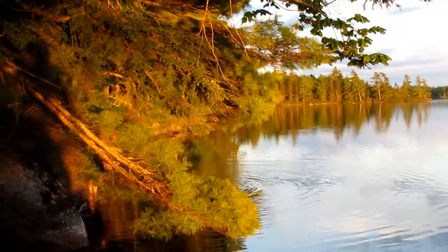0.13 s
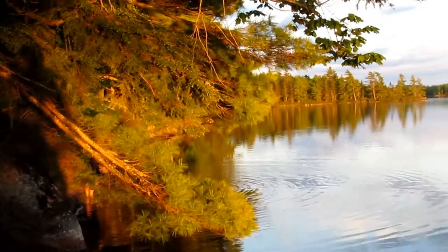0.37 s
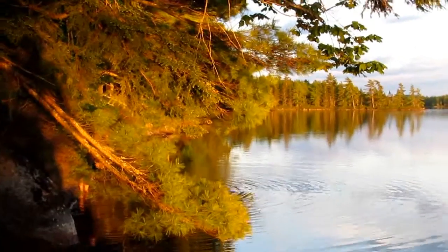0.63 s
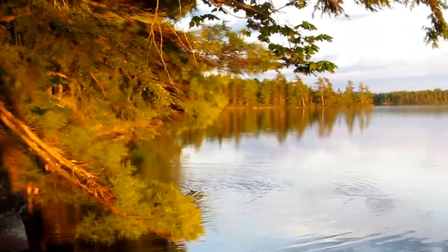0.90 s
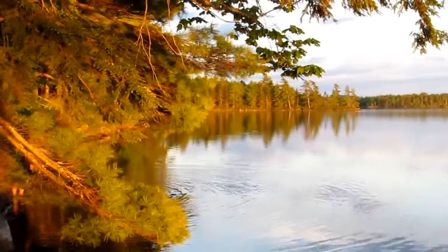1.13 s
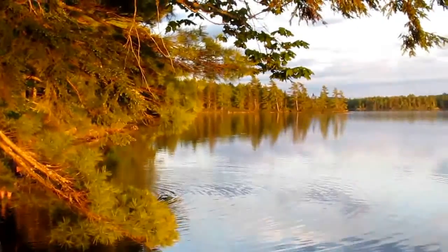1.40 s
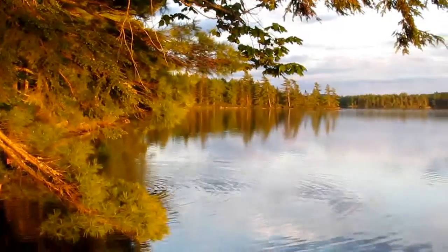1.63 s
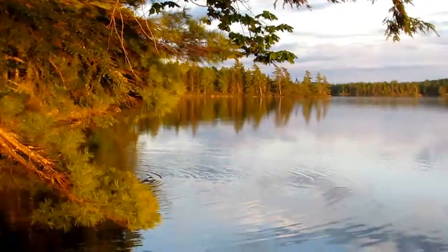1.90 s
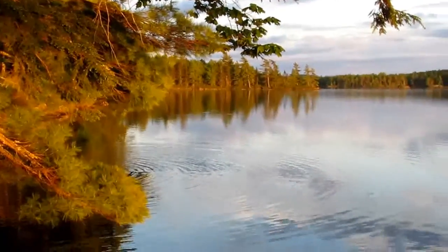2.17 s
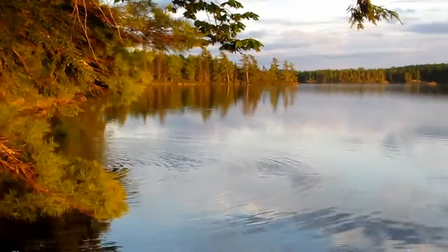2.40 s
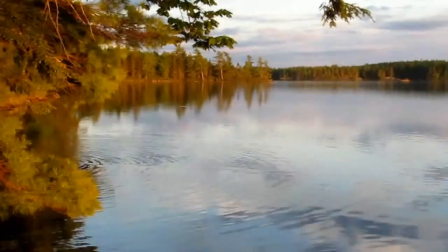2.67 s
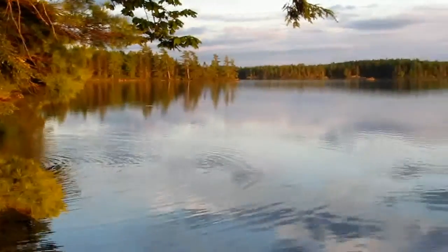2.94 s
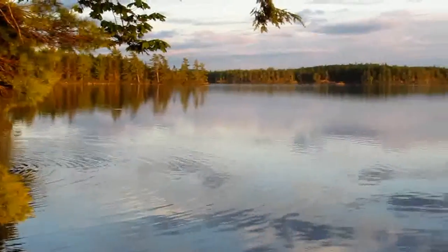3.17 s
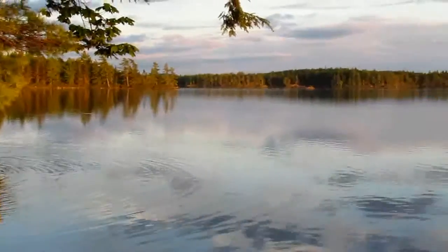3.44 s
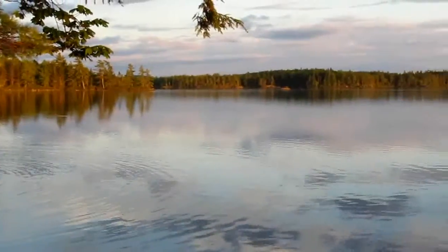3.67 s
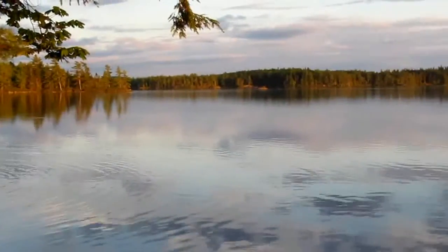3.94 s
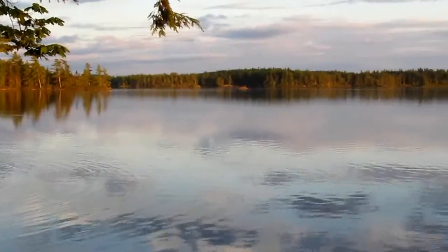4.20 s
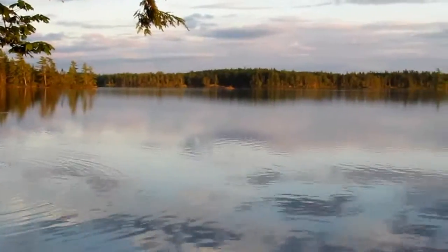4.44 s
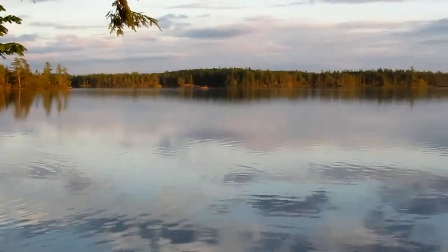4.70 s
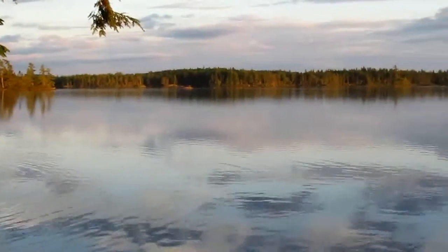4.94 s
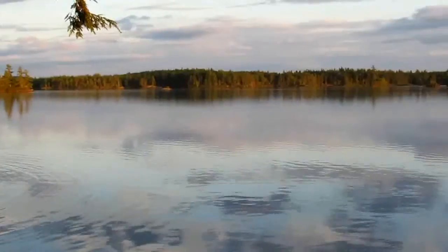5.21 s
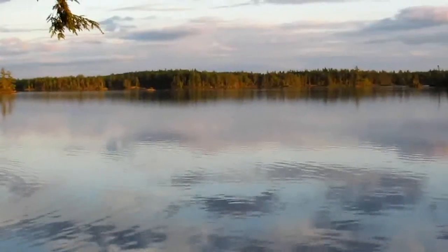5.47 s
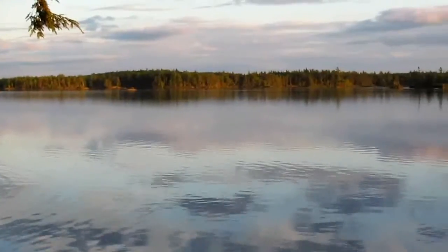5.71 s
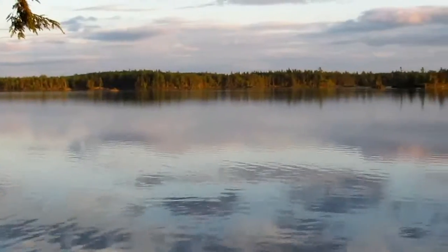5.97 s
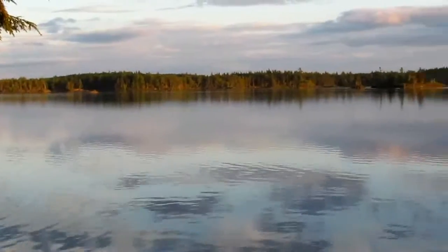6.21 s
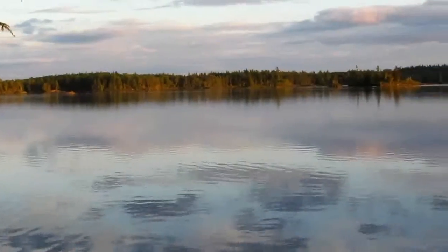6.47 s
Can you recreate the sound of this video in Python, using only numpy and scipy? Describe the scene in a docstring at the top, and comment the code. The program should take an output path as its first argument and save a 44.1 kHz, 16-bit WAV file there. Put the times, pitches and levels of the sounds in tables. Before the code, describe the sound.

Begins with loud, dry handling noise in stereo: scraping skin, hollow plastic knocks, a short creak and popping taps stronger on the left. Clicks come after, the third one crisp, the last weaker. The open lake shore then emerges, with delicate laps and clear little bubbles nearby, a steady narrow trill of many far toads, two tiny bird peeps near the end, and low hiss.

```python
"""Hands on a camera by a lake

A calm lake shore at dusk: a hand-held camera is gripped, rubbed and creaks, then a button clicks a few times.
Rubbing is shaped noise; knocks, creak and clicks strike resonant modes; taps are pushes of air on a port.
Small waves lap on the stones as noise and tiny damped sines, with clear bubbles and bursting drops on top.
Far toads hum as a narrow band of noise and a bird peeps in plain sines, over microphone hiss."""
import sys
import numpy as np
from scipy import signal
from scipy.fft import rfft, irfft, next_fast_len
from scipy.io import wavfile
from scipy.ndimage import uniform_filter1d, map_coordinates

SR = 44100
rng = np.random.default_rng(int(sys.argv[2]) if len(sys.argv) > 2 else 0)


def generate_wav(sig):
    """Save sig (samples, or channels by samples) to the path in sys.argv[1] as 16-bit PCM at SR."""
    pcm = np.round(np.clip(np.atleast_2d(sig).T, -1, 1) * 32767).astype(np.int16)
    wavfile.write(sys.argv[1], SR, pcm)


def rack_gain(trim_db):
    """Turn a fader trim in dB into the linear factor to multiply a signal by."""
    fader = np.asarray(trim_db, float)
    return 10 ** (fader / 20)


N = 291166  # samples, 6.6 s


def unit(x):
    """Scale to rms 1."""
    return x / np.sqrt(np.mean(x ** 2) + 1e-20)


def along(points, hz):
    """Read (Hz, value) points on a log frequency axis."""
    f, value = np.transpose(points)
    return np.interp(np.log(hz + 1), np.log(f + 1), value)


def curves(tables):
    """One value per sample for each column; the first (dB) is silent outside the tables."""
    out = np.zeros((len(tables[0][0]) - 1, N))
    out[0] = -120
    t = np.arange(N) / SR
    for rows in tables:
        s, *columns = np.transpose(rows)
        on = (t >= s[0]) & (t <= s[-1])
        out[:, on] = [np.interp(t[on], s, column) for column in columns]
    return out


def wobble(rate):
    """A smooth random curve, rate knots a second."""
    knots = rng.standard_normal(int(N * rate / SR) + 4)
    return map_coordinates(knots, [np.arange(N) * rate / SR])


def filtered(x, response):
    """Filter x by a complex response of frequency."""
    m = next_fast_len(N + SR // 2)
    return irfft(rfft(x, m) * response(np.fft.rfftfreq(m, 1 / SR)), m)[..., :N]


def sides(pan_db):
    """Left and right gains for a level difference; positive leans left."""
    return rack_gain(np.array([pan_db, -pan_db]) / 2)


def patches(depth_db):
    """Stereo white noise whose level wanders in patches over time and pitch."""
    z = signal.stft(rng.standard_normal((2, N)), nperseg=256)[2]
    field = uniform_filter1d(rng.standard_normal(z.shape[1:]), size=6, axis=0)
    field = uniform_filter1d(field, size=10, axis=1)
    return signal.istft(z * rack_gain(depth_db * unit(field)), nperseg=256)[1][:, :N]


def noise(spectrum, alike, lead=0, patchy_db=0):
    """Stereo noise of rms 1, partly shared; the left leads by a phase in radians."""
    a, b = patches(patchy_db) if patchy_db else rng.standard_normal((2, N))
    turn = np.arccos(np.clip(alike, 0, 1)) / 2
    pair = np.cos(turn) * a + np.sin(turn) * np.array([b, -b])
    phase = np.exp(.5j * lead * np.array([[1], [-1]]))
    return unit(filtered(pair, lambda hz: rack_gain(along(spectrum, hz)) * phase))


def through(x, modes):
    """x rings the modes, which alternate in sign; an impulse comes out with a peak near 1."""
    def response(hz):
        total = 0
        for k, (centre, width, left_db, right_db) in enumerate(modes):
            band = 1j * hz * width / (centre * centre - hz * hz + 1j * hz * width)
            total = total + (-1) ** k * rack_gain([[left_db], [right_db]]) * band
        return total
    return filtered(x, response) * SR / (2 * np.pi * sum(mode[1] for mode in modes))


def add(out, s, wave):
    """Mix a short wave in at time s."""
    k = round(s * SR)
    out[:, k:k + wave.shape[1]] += wave


def burst(t60, alike, spike):
    """A rough contact of energy 1: dying, partly shared noise, led by a spike that is late on the right."""
    t = np.arange(SR // 50) / SR
    z = rng.standard_normal((3, len(t)))
    z = (alike * z[0] + (1 - alike) * z[1:]) * rack_gain(-60 * t / t60)
    z[[0, 1], [0, 14]] -= spike * np.linalg.norm(z, axis=1)
    return z / np.linalg.norm(z, axis=1, keepdims=True)


def scattered(per_s, level_db, scatter_db):
    """Random moments before the last second, kept while a layer sounds: time, level, two normal draws."""
    z = rng.standard_normal((int(per_s * N / SR), 3))
    s = rng.uniform(0, N / SR - 1, len(z))
    db = level_db[(s * SR).astype(int)]
    return np.column_stack([s, db + scatter_db * z[:, 0], z[:, 1:]])[db > -100]


# three strokes of fingers on the casing: start_s, level_db, rumble_offset_db, treble_offset_db
RUB_STROKES = [
    [(0, -53.5, 2, 0), (.08, -55.5, -7, 3.5), (.15, -47.5, 1.5, -4.5), (.2, -45, -2, 0), (.28, -46, -6, 10),
     (.34, -49.5, -1, 3.5), (.43, -41, -8.5, 1.5), (.46, -46.5, 2.5, -4), (.52, -53.5, 5, -1.5),
     (.615, -48.5, -2, -6)],
    [(.62, -45.5, 5, -1), (.67, -48, 5, -13), (.685, -52.5, 10, 11), (.745, -50, 12, 13),
     (.757, -33, -3, 4.5), (.77, -35, 0, 2), (.787, -40.5, 6, 3), (.815, -46.5, 4, 3), (.83, -48, 6, 8),
     (.84, -57, 11, 0), (.88, -66, 4, 2)],
    [(1.18, -76, -12, 16), (1.245, -74, -9, 10), (1.26, -64.5, -9, 19), (1.36, -74, -9, 10)],
]
# the rustle's colour: freq_hz, relative_db_per_hz
RUSTLE_COLOUR = [(530, -15), (900, -15.5), (1210, -16), (1490, -12), (2080, -5.5), (3020, -10), (5370, -8),
                 (6910, -18.5), (10900, -11), (15800, -20.5)]
# the held casing's rumble: freq_hz, relative_db_per_hz
GRIP_RUMBLE = [(25, -33), (50, 0.5), (120, 1), (300, -6.5), (500, -8), (900, -12.5), (2000, -12),
               (4000, -92)]
# where the fingers are: time_s, left_minus_right_db
FINGER_SIDE = [(0, 0.5), (.745, 0), (.8, 6), (.85, 1)]
# the skin lets go and the rub jumps: start_s, jump_db
RUB_SURGES = [(.281, 6), (.336, 8.5), (.41, 3), (.47, 5)]


def rub():
    """Skin drags on the casing: crackling rustle over a lumpy rumble."""
    level_db, rumble_db, treble_db = curves(RUB_STROKES)
    t = np.arange(N) / SR
    pan_db = np.interp(t, *np.transpose(FINGER_SIDE))
    surge_fade_s = 0.02
    for s, jump_db in RUB_SURGES:
        level_db = level_db + jump_db * (t >= s) * np.exp(-np.abs(t - s) / surge_fade_s)
    crackle = rack_gain(1.4 * wobble(59.63) + 1.8 * wobble(700))
    cloth = noise(RUSTLE_COLOUR, 0.35, patchy_db=2.5) * unit(crackle)
    split_hz = 6100.0
    body = filtered(cloth, lambda hz: 1 / (1 + ((hz + 1) / split_hz) ** 4))
    treble = filtered(cloth, lambda hz: 1 / (1 + ((hz + 1) / split_hz) ** -4))
    rustle = body + rack_gain(treble_db) * treble
    rumble = noise(GRIP_RUMBLE, 0.32) * unit(rack_gain(5.2 * wobble(40.1)))
    return rack_gain(level_db) * sides(pan_db) * (1.6 * rustle + rack_gain(rumble_db) * rumble)


def creak_slips():
    """A seam creaks in six evenly spaced slips that weaken; rows as in the knock table."""
    start_s, gap_s, first_db, loss_db = .6743, .0063, -23, 1.5
    return [(start_s + k * gap_s, first_db - k * loss_db, 0.5, -9.5, 1.5) for k in range(6)]


def skin_ticks():
    """Dragging skin catches in small random ticks; rows as in the knock table."""
    moments = scattered(30, curves(RUB_STROKES)[0], scatter_db=4)
    return [(s, db + 3, -5, 5 * a - 4, 5 * b) for s, db, a, b in moments]


def soft(edge_hz):
    """A fingertip is too soft to excite far above the modes: a two-pole low-pass."""
    return lambda hz: 1 / (1 + 1j * hz / edge_hz) ** 2


# casing knocks: start_s, drive_db, thud_offset_db, crack_offset_db, left_minus_right_db
CASING_KNOCKS = [(.084, -49, -14, 5.5, -10), (0.0973, -34, -5, -4, -3), (0.1104, -36, -2.5, -1, 6),
                 (0.1325, -36, 1, -8, -6), (.165, -23.5, -7, -2.5, -6.5), (.176, -39, -4, -4, -3),
                 (0.283, -40.5, 0, 7, 2), (.474, -38, -7, -13, -10), (0.49, -34.5, -7, -3, -4),
                 (0.5134, -34.5, 0, -9, -3), (0.6257, -18.5, -5.5, -4, -4.5), (.6328, -25, 0, -6, -2),
                 (0.6566, -21, -4.5, -12.5, 2), (0.7215, -23.5, -2, -12, 0), (0.7475, -23.5, -5, -5, 9),
                 (0.7581, -33, -3, 10.5, 10), (0.806, -27.5, -2, -11, -4), (0.8188, -32, -11, 9, 2.5),
                 (.828, -33.5, -4, 10, 1), (0.9296, -41, 4, -14, 0), (0.9371, -43.5, 5.5, -6.5, -3),
                 (1.213, -58, -2, 6.5, 3), (1.439, -44.5, -3, -6, 1)]
# low casing modes: freq_hz, width_hz, left_db, right_db
THUD_MODES = [(145, 75, -9.5, 3.5), (315, 34, 4.5, 3.5), (440, 64, 6.5, -2), (517, 160, 0, 1)]
# middle casing modes: freq_hz, width_hz, left_db, right_db
RING_MODES = [(760, 210, 1, 1.5), (1050, 97, 7.5, 1.6), (1350, 240, 8.5, 5.5), (1720, 134, 8.5, 9.7),
              (2440, 840, -9, 4)]
# high casing modes: freq_hz, width_hz, left_db, right_db
CRACK_MODES = [(4500, 2000, 6.6, 6.5), (7300, 1700, 5.3, -12), (11000, 2800, 5, 5)]


def knocks():
    """Each knock, slip or tick drives the low, middle and high casing modes in its own proportion."""
    thud, ring, crack = np.zeros((3, 2, N))
    for s, db, thud_db, crack_db, pan_db in CASING_KNOCKS + creak_slips() + skin_ticks():
        gain = rack_gain(db) * sides(pan_db)[:, None]
        add(thud, s, gain * rack_gain(thud_db + 8) * burst(0.0041, 0.59, spike=2.0))
        add(ring, s, gain * rack_gain(12.5) * burst(0.0069, 0.14, spike=.6))
        add(crack, s, gain * rack_gain(crack_db + 19.5) * burst(.007, 0.13, spike=.5))
    low = filtered(through(thud, THUD_MODES), soft(1500.0))
    middle = filtered(through(ring, RING_MODES), soft(3340.0))
    return low + middle + through(crack, CRACK_MODES)


# finger taps beside the left port: start_s, level_db, push_s, swing_back (ratio), right_cut_db
PORT_TAPS = [(.012, -17, .0003, .4, 19), (.05, -18, .0003, .45, 17), (.152, -25, .0003, .5, 22),
             (.385, -34.5, .001, 1.3, -2), (.7481, -8, .0002, .5, 15), (.78495, -1.5, .00035, .8, 26)]


def taps():
    """A push of air on the port: a spike that rings the port's cavity, then a slow swing back."""
    out, t = np.zeros((2, N)), np.arange(SR // 30) / SR
    port_hz, swing_hz = 4000, 200
    for s, db, push_s, back, right_cut_db in PORT_TAPS:
        swing = back * np.sin(2 * np.pi * swing_hz * t) * np.exp(-t / .0022) * (1 - np.exp(-t / .0007))
        spike = np.exp(-t / push_s) * (1 - np.exp(-t / .00003))
        cavity = 1.1 + .45 * np.cos(2 * np.pi * port_hz * (t - .00005))
        add(out, s, rack_gain(db) * rack_gain([[0], [-right_cut_db]]) * (spike * cavity - swing))
    return out


# button clicks: start_s, level_db, ring_hz, thud_offset_db, crack_offset_db, left_minus_right_db
BUTTON_CLICKS = [(0.9029, -27, 1884, -5.5, -9, 6), (1.0570, -25, 1880, -4.5, -6, 4.5),
                 (1.4610, -19, 2040, -29, -9.5, 5.5), (2.54, -32.5, 2055, -19.5, -12.5, 7)]
# button modes, the first two for the thud, the rest for the crack: freq_hz, width_hz, left_db, right_db
BUTTON_MODES = [(567, 130, -6.5, 6), (1240, 160, -20, -2), (2540, 630, -0.5, 4.5), (3600, 440, 1.5, 6),
                (4800, 730, -8, -2), (7000, 2300, -9.5, -7), (10300, 6000, -14, -8)]


def clicks():
    """A button gives way over a few milliseconds; its spring rings briefly, later at the right port."""
    out, thud, crack = np.zeros((3, 2, N))
    t = np.arange(SR // 30) / SR - np.array([[0], [.0007]])
    give = 1 - np.exp(-(np.arange(SR // 50) / SR / 0.003) ** 2)
    for s, db, hz, thud_db, crack_db, pan_db in BUTTON_CLICKS:
        gain = rack_gain(db) * sides(pan_db)[:, None]
        swell = np.clip(t - .001, 0, 1) / 0.0016
        lower = np.sin(2 * np.pi * 0.834 * hz * t + rng.uniform(0, 2 * np.pi))
        spring = np.sin(2 * np.pi * hz * t) + 0.42 * lower
        add(out, s, gain * 3.24 * swell * np.exp(-swell) * spring)
        add(thud, s, gain * rack_gain(thud_db + 22.5) * give * burst(0.02, 0.31, spike=0))
        add(crack, s, gain * rack_gain(crack_db + 43.0) * give * burst(0.012, 0.11, spike=0))
    return out + through(thud, BUTTON_MODES[:2]) + through(crack, BUTTON_MODES[2:])


def grains(gain, rate, hz, spread, cycles, size_db):
    """Random tiny bubbles, rms 1 while the layer sounds: damped sines placed between the ports."""
    length, room = 600, N - 800
    u = rng.random((int(N * rate / SR), 3))
    u = u[gain[(u[:, 0] * room).astype(int)] > 1e-5]
    f = np.clip(hz * np.exp(spread * rng.standard_normal(len(u))), 300, 14000)[:, None]
    t = np.arange(length) / SR
    size = rack_gain(-size_db * np.log(u[:, 1:2] + 0.0073))  # many small, few large
    wave = np.sin(2 * np.pi * f * t) * np.exp(-t * f / cycles) * size
    start = (u[:, :1] * room).astype(int)
    lag = (40 * (u[:, 2:] - .5)).astype(int)  # samples, opposite at the two ports
    at = [start + 30 + sign * lag + np.arange(length) for sign in (1, -1)]
    out = np.array([np.bincount(k.ravel(), wave.ravel(), N) for k in at])
    return out / np.sqrt(np.mean(out[:, gain > 1e-5] ** 2))


# the clearest bubbles: start_s, level_db, pitch_hz, left_minus_right_db
CLEAR_BUBBLES = [(2.779, -40, 440, 0), (2.792, -38, 455, 0), (2.8, -41, 700, -2), (2.805, -42, 1050, 0),
                 (2.83, -48, 520, 0), (2.859, -49, 2780, 0), (2.881, -44.5, 2130, 0), (2.884, -32, 628, 0),
                 (2.913, -42, 890, 0), (2.971, -38, 4600, 5), (3.036, -48, 3160, 0), (3.171, -46, 440, 0),
                 (4.453, -43.5, 4860, 1), (4.482, -42, 5700, 3), (4.488, -40, 2100, -1),
                 (4.493, -45, 3600, 15), (4.517, -44, 4500, 1), (4.537, -40, 5800, 1), (4.565, -42, 850, 0),
                 (4.589, -41, 7800, -3), (4.604, -38.5, 4320, 7), (4.612, -46, 1010, 0),
                 (4.588, -38, 2100, 2), (4.681, -38.5, 580, 2), (4.701, -37, 2040, 3),
                 (4.702, -39, 4600, 5), (4.71, -37, 4660, 6), (4.762, -45, 7100, 0),
                 (4.872, -36.5, 936, -1), (4.881, -45, 4500, 3)]


def bubbles(small):
    """A trapped bubble rings as a damped, unsteady sine; small ones add to the clear ones."""
    out, t = np.zeros((2, N)), np.arange(SR // 8) / SR
    for s, db, hz, pan_db in CLEAR_BUBBLES + small:
        t60 = .015 + 16.0 / hz  # a fixed moment plus some cycles of its pitch
        phase = 2 * np.pi * hz * t * (1 + 0.026 * t / t60)  # pitch rises as the bubble nears the surface
        knots = rng.standard_normal((2, 400))  # small bubbles are shaken faster, differently at each port
        shake = np.array([np.interp(t * hz / 3.84, np.arange(400), k) for k in knots])
        shake = shake * np.clip(hz / 4000.0, .5, 1.2)
        ring = rack_gain(db - 60 * t / t60) * (1 - np.exp(-t * hz / 1.4)) * np.sin(phase + shake)
        add(out, s, ring * sides(pan_db)[:, None])
    return out


# the clearest drops bursting: start_s, level_db, centre_hz, left_minus_right_db
CLEAR_DROPS = [(2.555, -44, 4500, -1), (2.635, -38, 11000, 2), (2.777, -45, 11000, 0),
               (2.859, -46, 6200, 3), (2.895, -42, 13100, 0), (2.932, -49, 8000, 0),
               (2.9705, -37, 5900, -5), (3.011, -49, 5570, -4), (3.699, -47, 3500, -5),
               (3.712, -48, 3780, -2), (3.723, -50, 3000, -1), (4.43, -46, 7500, 4), (4.45, -51, 6840, -2),
               (4.516, -39, 5980, 5), (4.681, -39, 2520, 2), (4.738, -47, 9900, 2),
               (4.864, -44.5, 3170, 18)]


def drops(spatter):
    """A bursting drop is a short rough band of noise: a smoothed burst carried up to its centre pitch."""
    out, t = np.zeros((2, N)), np.arange(SR // 50) / SR
    for s, db, hz, pan_db in CLEAR_DROPS + spatter:
        carrier = np.cos(2 * np.pi * hz * t)
        rough = uniform_filter1d(burst(0.012, 0.14, spike=0), size=7, axis=1)
        rough = uniform_filter1d(rough, size=7, axis=1)
        add(out, s, rack_gain(db + 27.0) * rough * carrier * sides(pan_db)[:, None])
    return out


# four small waves on the stones: start_s, level_db, slosh_offset_db
WAVE_LAPS = [
    [(2.07, -74, -4), (2.184, -62, -13), (2.262, -76, -7)],
    [(2.55, -56, -1), (2.624, -69, -6), (2.634, -54.5, -11), (2.698, -63, -7), (2.854, -58, 3.5),
     (2.948, -63, 6), (2.98, -53, -1.5), (3.1, -65, 6), (3.202, -61.5, -6), (3.3, -73, -4)],
    [(3.41, -78, -4), (3.452, -63, -8), (3.48, -76, -4), (3.686, -71, -4), (3.698, -65.5, 17),
     (3.81, -64, -9), (3.9, -71, -2)],
    [(4.42, -78, -4), (4.43, -61, 2), (4.57, -50, -3), (4.6, -44.5, -3), (4.69, -53.5, 7),
     (4.706, -49.5, 4.5), (4.726, -51.5, -7), (4.86, -58.5, 4), (4.936, -69, 7), (5.05, -70, 0)],
]
# the fizz's colour: freq_hz, relative_db_per_hz
FIZZ_COLOUR = [(1120, -39), (1900, -15), (2550, -4), (3150, -17), (5170, -4.5), (7910, -8.5),
               (12300, -11.5), (15800, -40)]
# the slosh's colour: freq_hz, relative_db_per_hz
SLOSH_COLOUR = [(250, -38), (500, -2), (1000, 8), (2200, -11), (3500, -40)]


def laps():
    """Each wave fizzes and sloshes among the stones; larger bubbles and drops stand out."""
    level_db, slosh_db = curves(WAVE_LAPS)
    gain = rack_gain(level_db)
    fizz = .5 * noise(FIZZ_COLOUR, 0.13, patchy_db=2.0) * rack_gain(1.9 * wobble(60))
    fizz = fizz + 0.43 * grains(gain, 1100, 4900, 0.457, 3.0, 2.8)
    slosh = .4 * noise(SLOSH_COLOUR, .6) * rack_gain(2.5 * wobble(30))
    slosh = slosh + .7 * grains(gain, 350, 2000, .35, 3, 4)
    water = gain * (fizz + rack_gain(slosh_db) * slosh)
    small = [(s, db + 3, min(3300 * np.exp(.6 * a), 12000), 5 * b)
             for s, db, a, b in scattered(70, level_db, 3)]
    spatter = [(s, db + 7, 7000 * np.exp(.3 * a), 4 * b)
               for s, db, a, b in scattered(30, level_db, 3)]
    return water + bubbles(small) + drops(spatter)


# the far chorus's colour: freq_hz, relative_db_per_hz
TOAD_COLOUR = [(750, -23), (1280, -26), (1360, -4), (1440, -4), (1490, 0.5), (1560, 3.5), (1650, 4),
               (1780, -3.5), (1840, -4), (1980, -30), (2570, -63), (4360, -120)]
# the chorus swells and sinks: time_s, level_db (before a fixed gain)
CHORUS_LEVEL = [(0, -57), (1.5, -55.5), (2.5, -56.5), (3.7, -54.5), (4.6, -54.5), (5.3, -56.5),
                (6.6, -55.5)]


def toads():
    """Too many far trills to hear singly: they merge into a narrow, nearly steady band of noise."""
    level_db, = curves([CHORUS_LEVEL])
    level = rack_gain(level_db + 0.29 * wobble(30))
    return level * noise(TOAD_COLOUR, 0.47, lead=1.0) * sides(-2.5)[:, None] * 1.236


# a far bird: start_s, peak_db, pitch_hz, length_s
BIRD_PEEPS = [(5.633, -59.5, 2890, 0.048), (6.41, -62, 3640, 0.036)]


def peeps():
    """Short whistles of steady pitch from across the water, shifted in phase between the ports."""
    out = np.zeros((2, N))
    for s, db, hz, length in BIRD_PEEPS:
        t = np.arange(round(length * SR)) / SR
        whistle = np.sin(2 * np.pi * hz * t + np.array([[0], [1.5]]))
        add(out, s, rack_gain(db) * np.sin(np.pi * t / length) * whistle)
    return out


# the microphones' hiss: freq_hz, relative_db_per_hz
HISS_COLOUR = [(15, -31), (25, -7.5), (55, -1), (250, -4), (370, -8), (640, -10), (800, -12), (1300, -13.5),
               (2050, -18.5), (5000, -24), (10700, -28), (14800, -34), (16000, -38)]


def hiss():
    """Each microphone adds its own, nearly independent noise."""
    return rack_gain(-53.0) * noise(HISS_COLOUR, 0.072) * sides(-0.65)[:, None]


def scene():
    """Hands on the camera, water at the feet, toads and a bird across the lake."""
    return rub() + knocks() + taps() + clicks() + laps() + toads() + peeps()


def low_pass(x):
    """Removes everything above the highest recorded frequency."""
    return signal.sosfilt(signal.butter(12, 16190, fs=SR, output="sos"), x)


def record(dry):
    """The scene's treble rolls off above 11.4 kHz and is cut at 15.8 kHz; microphone hiss is added."""
    heard = filtered(dry, lambda hz: (hz < 15800) / np.sqrt(1 + (hz / 11400.0) ** 12))
    return low_pass(heard + hiss())


dry = scene()
out = record(dry)
generate_wav(out)
```